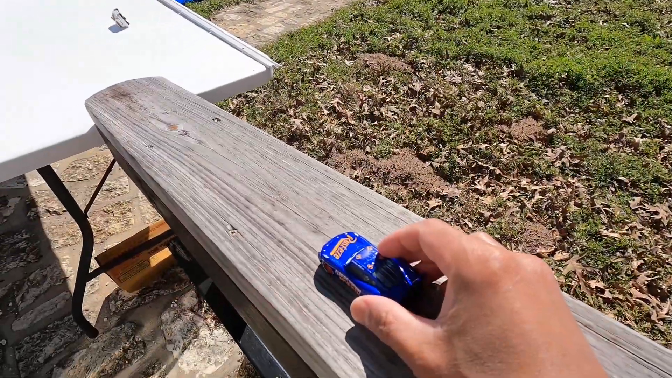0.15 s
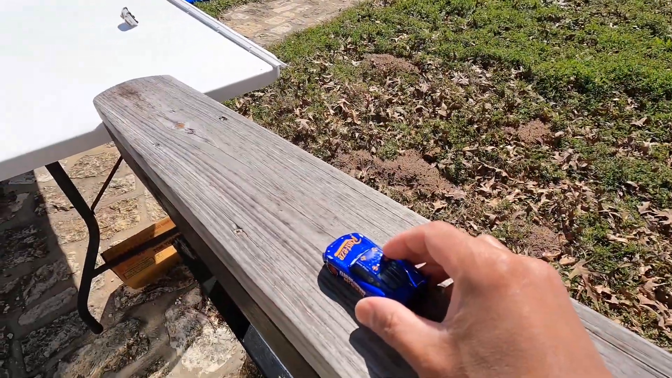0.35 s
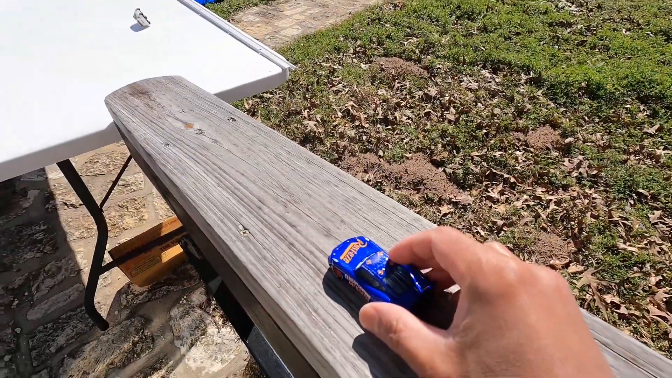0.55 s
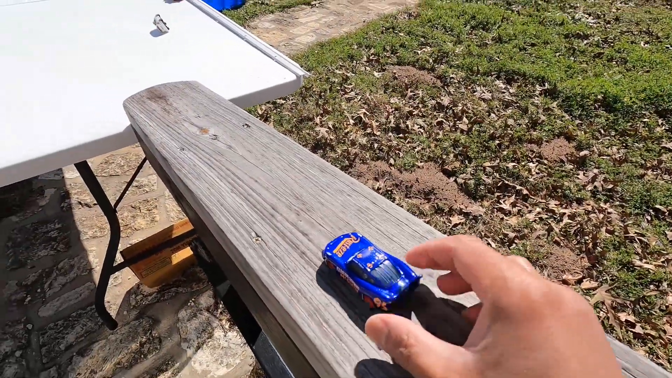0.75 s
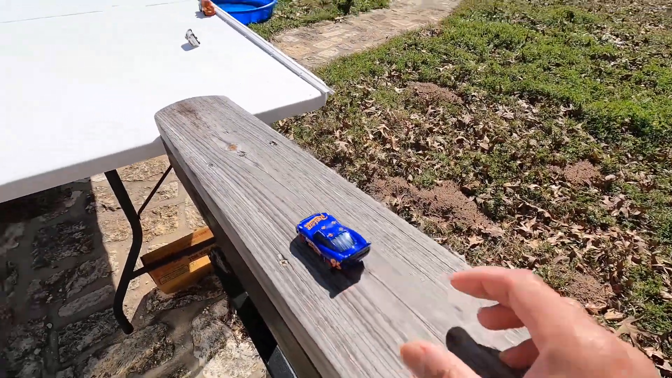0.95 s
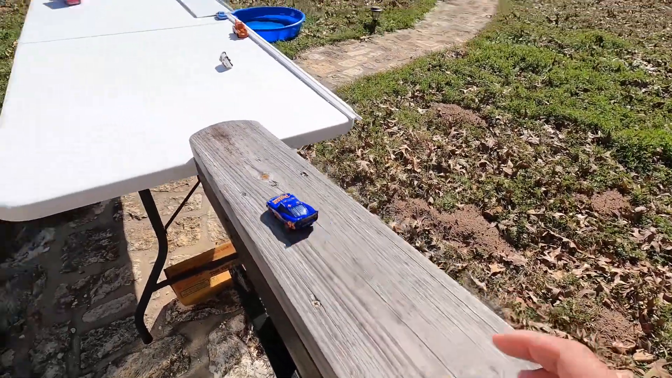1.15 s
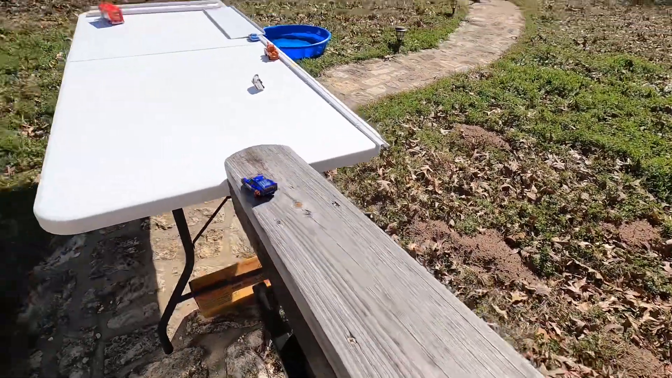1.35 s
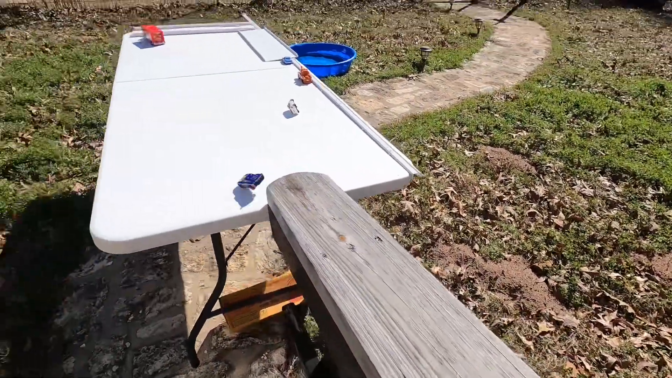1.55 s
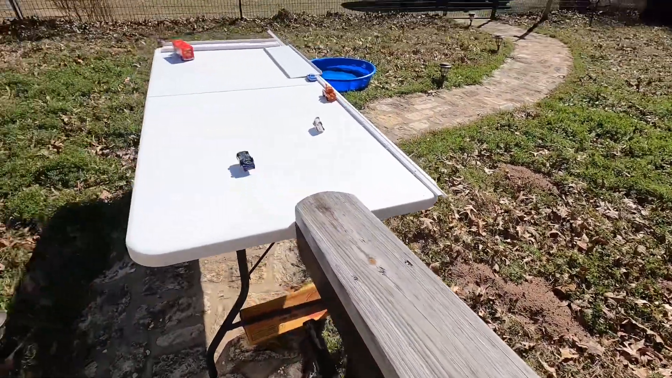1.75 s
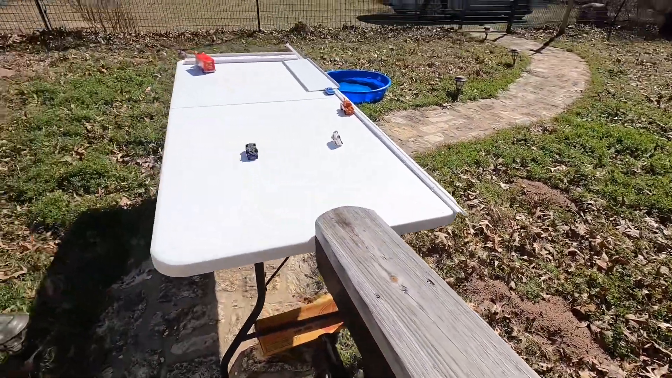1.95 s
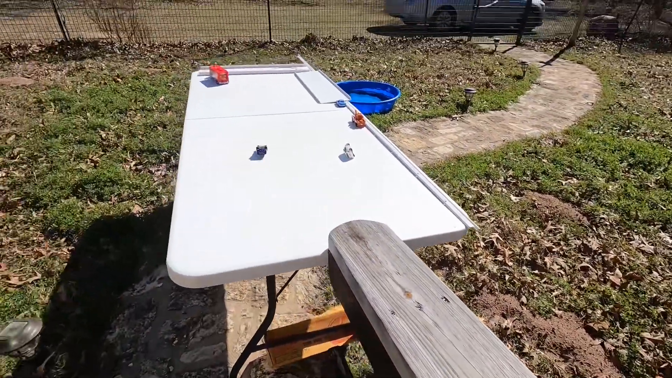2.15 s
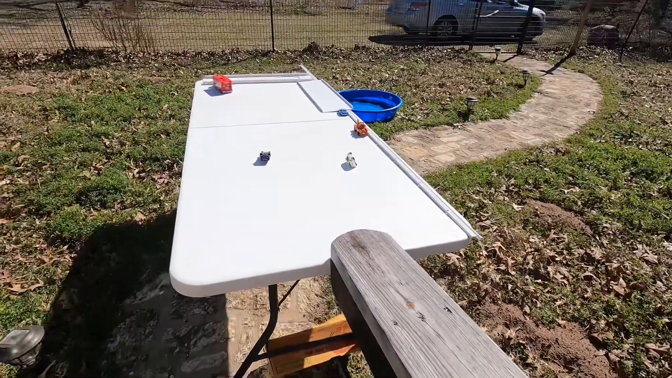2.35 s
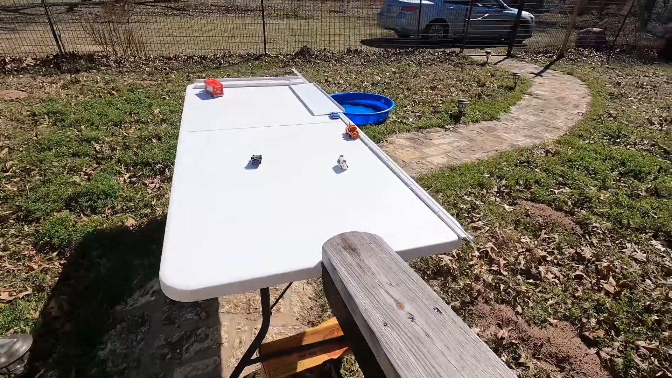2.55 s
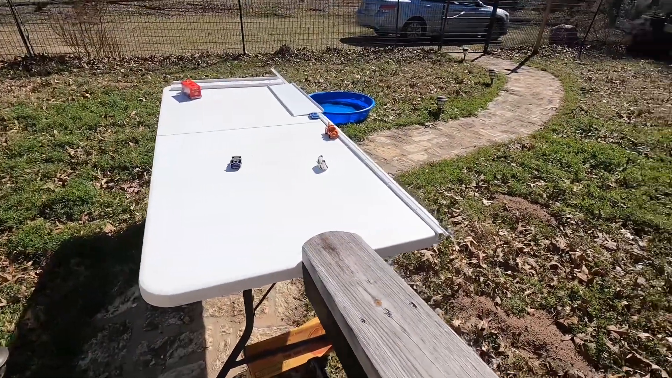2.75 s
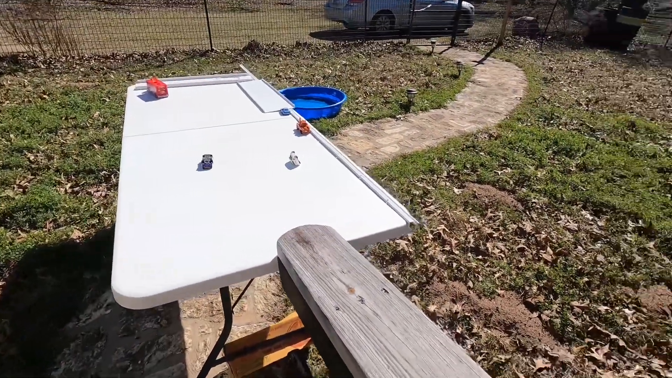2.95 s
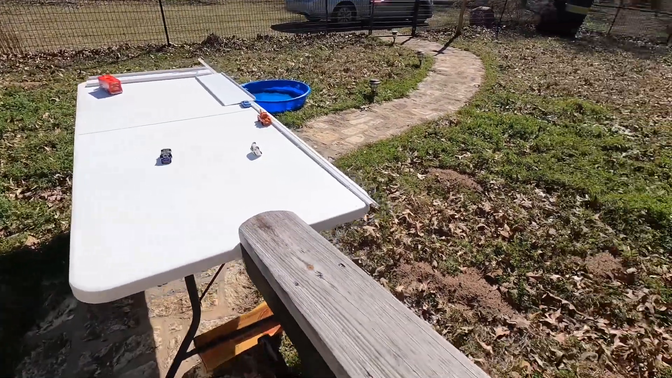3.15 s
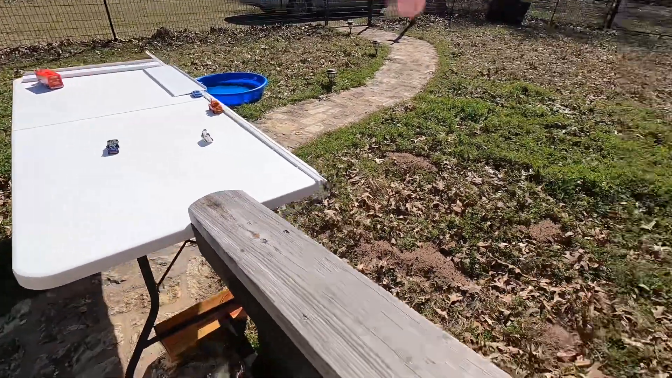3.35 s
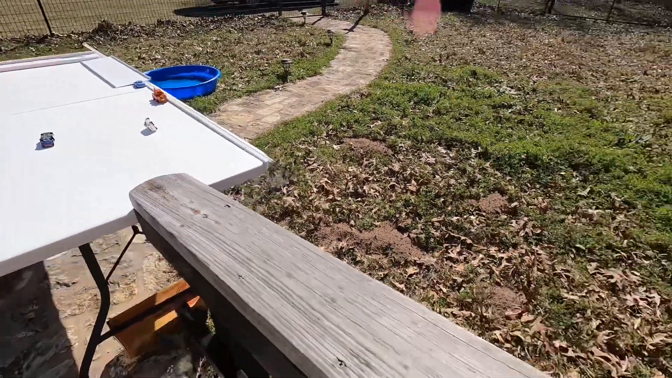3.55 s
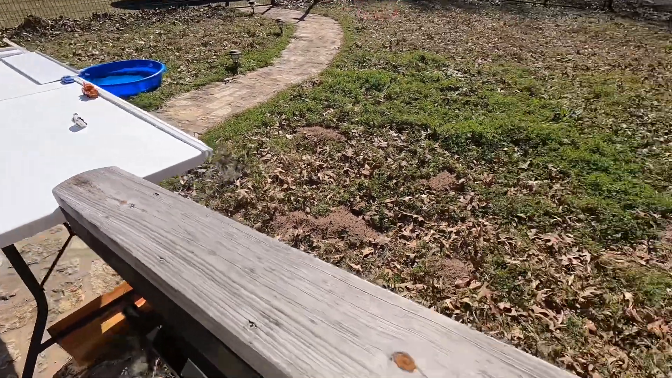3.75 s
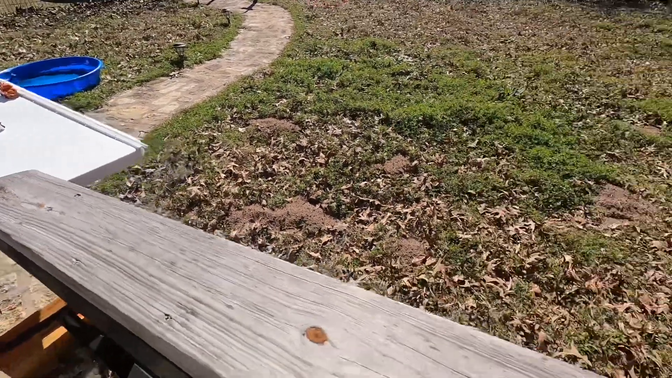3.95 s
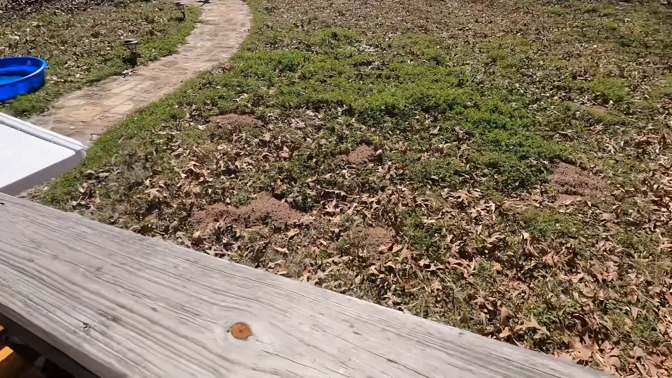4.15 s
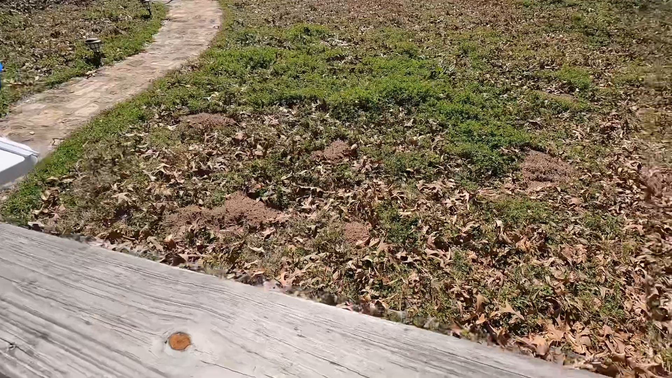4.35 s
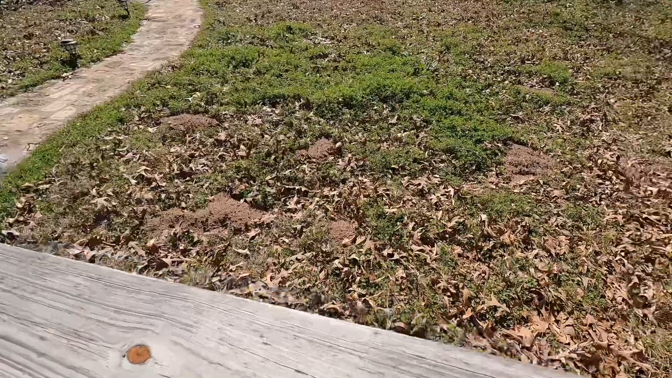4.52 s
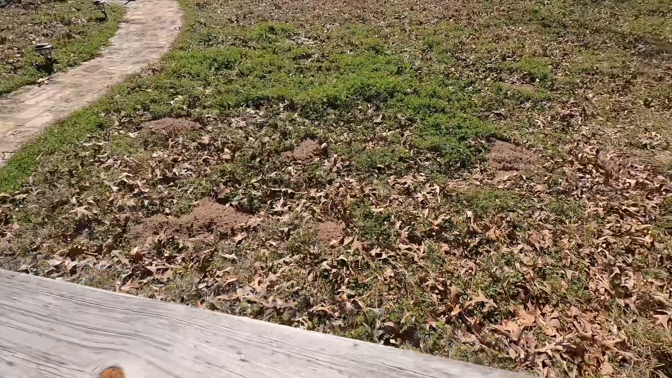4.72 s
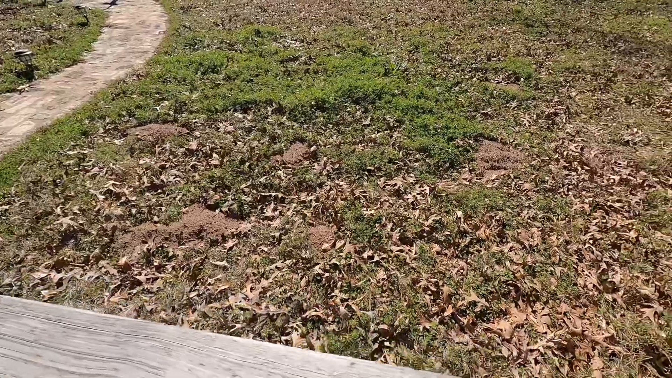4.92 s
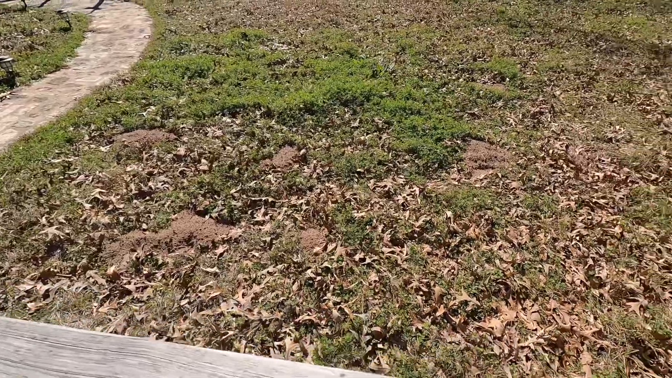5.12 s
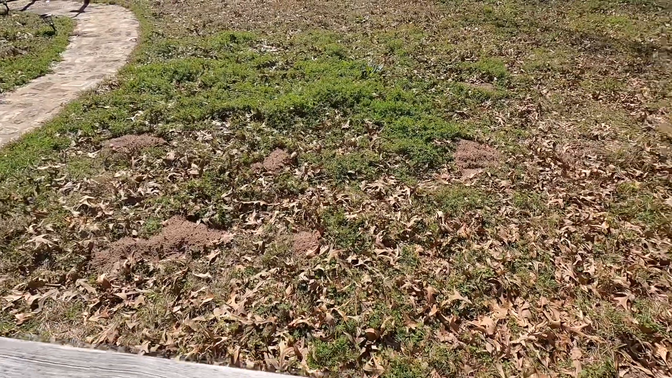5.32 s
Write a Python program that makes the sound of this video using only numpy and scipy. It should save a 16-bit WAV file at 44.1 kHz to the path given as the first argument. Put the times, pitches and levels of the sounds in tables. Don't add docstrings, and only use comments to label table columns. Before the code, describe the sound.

A small metal toy car rattles down a wooden board, clatters onto a hollow plastic table, skids, then toys clack in a bin outdoors.

```python
import sys
import numpy as np
from scipy import signal
from scipy.io import wavfile
from scipy.ndimage import uniform_filter1d

SR = 44100
rng = np.random.default_rng(int(sys.argv[2]) if len(sys.argv) > 2 else 0)


def master(y):
    cut = np.clip(np.atleast_2d(y).T, -1, 1)
    pcm = np.round(cut * 32767)
    wavfile.write(sys.argv[1], SR, pcm.astype(np.int16))


def magnitude_from_level(level_db):
    exponent = np.asarray(level_db, float) / 20
    return 10 ** exponent


N = 241793

# (frequency [Hz], width [Hz], level [dB])
TABLE = [(70, 43, -15), (124.7, 23.3, -5.5), (171.5, 18.7, -4.5), (197, 25, -2.5), (258, 94, 2.5),
         (309.3, 33, -3), (403, 42, -8), (475, 103, 0.5), (610, 123, -3.5), (751, 62, -12.5),
         (928, 134, -6.5), (1200, 45, -16), (1450, 170, -12.5), (1800, 64, -15.5)]
# (frequency [Hz], width [Hz], level [dB])
SHELL = [(1160, 320, -6.5), (1515, 560, -2), (1780, 460, -2), (2136, 310, -1), (2450, 310, -6),
         (3024, 330, -4), (3416, 630, -1), (4390, 603, -2)]
# (frequency [Hz], width [Hz], level [dB])
SHELL_TOP = [(4670, 390, -5.5), (5220, 550, -0.5), (6480, 520, -8.5), (7180, 820, -4.5), (9430, 1520, -3.5),
             (10400, 3500, -16), (12920, 1600, -17.5)]


def rms_one(x):
    return x / np.sqrt(np.mean(x ** 2) + 1e-20)


def gains(*tables):
    knots = np.arange(0, N + 30, 30) / SR
    steps = 0
    for table in tables:
        s, *columns = np.transpose(table)
        steps = steps + magnitude_from_level([np.interp(knots, s, column, -200, -200) for column in columns])
    smooth = uniform_filter1d(steps, size=10, axis=1)
    return np.array([np.interp(np.arange(N) / SR, knots, row) for row in smooth])


def swells(rows, depth_db):
    shapes = []
    for start, rise, hold, fall, db in rows:
        times = start + np.cumsum(np.abs([0, rise, hold, fall]))
        shapes.append(np.transpose([times, db - depth_db * np.array([1, 0, 0, 1])]))
    return gains(*shapes)[0]


def at_hz(points, hz):
    points_hz, values = np.transpose(points)
    return np.interp(np.log(hz), np.log(points_hz), values)


def drift(rate):
    r = np.exp(-2 * np.pi * rate / SR)
    return rms_one(signal.lfilter([1], [1, -2 * r, r * r], rng.standard_normal(N + SR))[SR:])


def ring(clicks, hz, width_hz):
    w = 2 * np.pi * hz / SR
    r, wide = np.exp(-np.pi * width_hz / SR), np.exp(-3.0 * np.pi * width_hz / SR)
    free = signal.lfilter([0, 2 * np.sin(w)], [1, -2 * r * np.cos(w), r * r], clicks + 1e-18)
    soften = [(1 - wide ** 2) / 2, 0, (wide ** 2 - 1) / 2]
    return signal.lfilter(soften, [1, -2 * wide * np.cos(w), wide ** 2], free)


def grains(per_s, spread_db, table):
    t = np.arange(N) / SR
    born = (rng.random(N) < per_s / SR) & (t >= table[0][0]) & (t <= table[-1][0])
    size = magnitude_from_level(spread_db * np.minimum(rng.exponential(1, N), 3.2))
    return born * size * rng.choice([-1, 1], N)


def rattled(clicks, modes, scatter_db):
    out, at = np.zeros(N), np.flatnonzero(clicks)
    during = slice(at[0], at[-1] + 1)
    for hz, width, db in modes:
        push = np.zeros(N)
        push[at] = clicks[at] * magnitude_from_level(db + scatter_db * rng.standard_normal(len(at)))
        out[during] += ring(push[during], hz, width)
    return out / np.std(out[during])


def struck(times, levels_db, chatter_s, modes, scatter_db=4.5, first_db=8, rise_s=0.0009):
    out, t = np.zeros(N), np.arange(4000) / SR
    slowest_s = 2.2 / min(width for _, width, _ in modes)
    for s, level_db, t60 in np.broadcast(times, levels_db, chatter_s):
        at = round(s * SR)
        shape = np.exp(-np.log(1000) * t / max(t60, .002)) * (1 - np.exp(-t / max(rise_s, 1e-4)))
        push = shape * rng.standard_normal(4000) * (rng.standard_normal(4000) > .8)
        push *= np.sqrt(np.sum(shape ** 2) / 5 / (np.sum(push ** 2) + 1e-9))
        push[0] = magnitude_from_level(first_db)
        end = min(4000, round(SR * (t60 + slowest_s)))
        for hz, width, db in modes:
            strength, detune = rng.standard_normal(2)
            signs = 1 - 2 * rng.integers(2, size=end, dtype=np.int8)
            rung = ring(push[:end] * signs, hz * (1 + 0.029 * detune), width)
            out[at:at + end] += magnitude_from_level(level_db + db + scatter_db * strength) * rung
    return out


def sung(rows, width_hz):
    return sum(struck(s, db, t60, [(hz, width_hz, 0)], scatter_db=-6.5, first_db=-10, rise_s=0.0027)
               for s, db, hz, t60 in rows)


def banded_noise(spectrum, patchy_db):
    # (frequency [Hz], likeness [0..1])
    likeness = [(100, 0.98), (1000, 0.35), (5000, 1), (9000, 1), (13000, .2)]
    out, together = 0, drift(12)
    white = rng.standard_normal((2, 2, N))
    edges = 80 * 2 ** (np.arange(24) / 3)
    edges = edges[edges >= spectrum[0][0]]
    for k, (low, high) in enumerate(zip(edges, edges[1:])):
        band = signal.butter(2, [low, high], "band", fs=SR, output="sos")
        mid, side = signal.sosfilt(band, white[k % 2])
        hz = np.sqrt(low * high)
        alike = np.clip(at_hz(likeness, hz), 0, 1)
        pair = np.sqrt(1 + alike) * mid + np.sqrt(1 - alike) * side * [[1], [-1]]
        out = out + magnitude_from_level(at_hz(spectrum, hz)) * pair
    return rms_one(out * magnitude_from_level(patchy_db * together))


def rolling():
    # (time [s], level [dB])
    roll = [
        (0.62, -77),
        (0.684, -57),
        (0.86, -43),
        (0.988, -39.5),
        (1.098, -40.5),
        (1.358, -42),
        (1.462, -40.5),
        (1.495, -50),
        (1.549, -59),
    ]
    # (time [s], peak [dB])
    ridges = [(0.7566, -37), (0.7666, -35), (0.776, -38), (0.7918, -39), (0.8077, -42), (0.833, -32.5),
              (0.8409, -43), (0.857, -39), (0.8655, -40), (0.8818, -31), (0.8935, -21.5), (0.903, -33),
              (0.9147, -31), (0.9236, -33), (0.9366, -42), (0.944, -31), (0.9556, -25.5), (0.967, -24),
              (0.977, -19), (0.991, -18), (1.003, -28), (1.0167, -20.5), (1.0281, -26.5), (1.0344, -30),
              (1.0427, -30), (1.047, -27.5), (1.0658, -39), (1.0787, -26), (1.0867, -33), (1.093, -23),
              (1.102, -37), (1.107, -24), (1.1229, -22), (1.1349, -19), (1.1411, -20), (1.1544, -23),
              (1.1596, -25), (1.1678, -30), (1.1776, -25.5), (1.1898, -29), (1.2047, -22.5),
              (1.2146, -23.5), (1.2264, -20.5), (1.2366, -23), (1.2477, -23), (1.256, -21.5), (1.265, -25),
              (1.279, -20), (1.293, -26), (1.3046, -27), (1.313, -20), (1.321, -26.5), (1.3384, -19),
              (1.353, -19), (1.363, -19.5), (1.383, -22), (1.402, -23.5), (1.4107, -28), (1.4253, -19),
              (1.442, -22)]
    # (frequency [Hz], width [Hz], level [dB])
    body = [(1406, 250, -13), (1786, 270, -4.5), (2170, 404, 3), (2544, 290, -7), (3300, 960, -10.5),
            (4150, 950, -1.5)]
    axles = [(5210, 140, -2.5), (5000, 590, -5.5), (6600, 750, 3.5), (7300, 900, 5), (8870, 310, -7.5),
             (9700, 2200, 5), (12600, 1800, -22)]
    # (start [s], rise [s], hold [s], fall [s], level [dB])
    board_end = [(1.31, 0.055, 0.26, 0.03, -40.5)]
    # (time [s], level [dB], frequency [Hz], chatter [s])
    flight = [
        (1.475, -52, 5200, .1),
        (1.5, -54, 5180, 0.074),
        (1.508, -50, 2950, 0.029),
        (1.515, -61, 5850, .07),
    ]
    s, rattle_db = np.transpose(roll)
    axle_db = rattle_db - 15 + 25.5 * (s - 1)
    rattle, bright, hum = gains(np.transpose([s, rattle_db, axle_db, rattle_db - 15.5]))
    clicks = grains(per_s=2800, spread_db=-0.5, table=roll) * magnitude_from_level(0.83 * drift(90))
    s, peak_db = np.transpose(ridges)
    jolts = struck(s, peak_db - 13, 0.011, body + [(1150, 260, -19)], 2.5, first_db=2.5)
    jolts += struck(s, peak_db - 30, 0.018, axles, first_db=3.0)
    end = swells(board_end, depth_db=33) * rattled(clicks, [(195, 21.5, 0)], 1.7)
    board = hum * rattled(clicks, [(168.0, 21, -2.5), (292, 47, -4.5)], 4.7)
    wheels = rattle * rattled(clicks, body, 6.5) + bright * rattled(clicks, axles, 6.0)
    return wheels + jolts + sung(flight, width_hz=130) + board + end


def tumbling():
    # (time [s], peak [dB], table boom over the peak [dB], face [Hz], chatter [s])
    landings = [(1.3337, -19.5, -37, 2200, 0.025), (1.4691, -13, -23.5, 2170, 0.033),
                (1.4846, -21, -28, 1990, 0.013), (1.548, -33, 4, 1040, 0.03),
                (1.559, -3, -6.5, 3340, 0.041), (1.5914, -3.5, -20, 2750, 0.038),
                (1.646, -14.5, -6.5, 2750, 0.034), (1.7082, -4.5, -8, 2640, 0.026),
                (1.7939, -12.5, 1, 2700, 0.061), (1.8047, -10.5, -10.5, 2330, 0.029),
                (1.833, -15.5, 2.5, 2220, 0.07), (1.851, -16, -7, 2200, 0.037),
                (1.863, -28, -11, 2300, 0.025), (1.889, -27.5, 3, 3300, 0.078),
                (1.9727, -45.5, 16, 3300, 0.027), (2.162, -32, 7.5, 2310, 0.016),
                (2.1807, -32, 8.5, 2410, 0.13), (2.201, -34, -1, 2300, 0.026),
                (2.213, -35, -11, 2200, 0.033), (2.239, -37.5, -21, 2180, 0.061),
                (2.2612, -37.5, -13, 2170, 0.072), (2.276, -34.5, -1, 2130, 0.046),
                (2.294, -39.5, 1.5, 2190, 0.04), ]
    s, peak_db, boom_db, face_hz, chatter_s = np.transpose(landings)
    metal = struck(s, peak_db - 20.5, chatter_s, SHELL, 1.9, first_db=2.5)
    metal += struck(s, peak_db - 23, 1.25 * chatter_s, SHELL_TOP, 0.97, first_db=0.0)
    face = sum(struck(at, db - 16, .6 * t60, [(hz, 330, 0)], scatter_db=0, first_db=6)
               for at, db, hz, t60 in zip(s, peak_db, face_hz, chatter_s))
    boom = struck(s, peak_db + boom_db - 22.0, 0.043, TABLE[:5], 0.93, first_db=9.0)
    knock = struck(s, peak_db + 0.84 * boom_db - 23.5, 0.054, TABLE[5:], 1.0, first_db=10.0)
    buzz = struck(s, peak_db + boom_db - 34, 0.31, TABLE[5:], 1.4, first_db=-5.5, rise_s=0.0049)
    return metal + face + boom + knock + buzz


def skidding():
    # (time [s], level [dB])
    force = [
        (1.84, -31),
        (1.858, -27),
        (1.909, -39),
        (2.158, -45.5),
        (2.182, -53),
        (2.272, -75),
        (2.294, -44),
        (2.316, -84),
        (2.396, -90.5),
    ]
    span = [(1.3,), (2.9,)]
    # (start [s], rise [s], hold [s], fall [s], level [dB])
    high_squeal = [(1.86, 0.028, 0.237, 0.038, -56)]
    roof_tone = [
        (1.97, 0.021, 0.097, 0.07, -44),
        (2.17, 0.01, 0.018, 0.123, -39.5),
    ]
    axle_spin = [
        (1.32, 0.016, 0.05, 0.2, -60),
        (2.13, 0.039, 0.046, 0.2, -62),
    ]
    tip_scrape = [
        (2.712, 0.04, 0.05, 0.065, -51),
    ]
    # (time [s], frequency [Hz], level [dB])
    drone = [
        [(1.86, 136, -40), (1.928, 129.2, -45), (2.04, 159.3, -33.5), (2.166, 146.7, -39.5),
         (2.196, 154.6, -26.5), (2.234, 130.4, -34.5), (2.36, 157, -44), (2.47, 157, -63.5)],
        [(2.73, 112, -62), (2.76, 111, -41.5), (2.816, 114, -41.5), (2.87, 154, -38.5), (2.95, 160, -65.5)],
    ]
    # (frequency [Hz], level [dB per Hz])
    grit = [(290, -16), (500, 5.5), (839, -16), (2360, -10), (5200, -20), (7780, -23), (10200, -20.5),
            (15500, -44)]
    s, force_db = np.transpose(force)
    scrape, rumble = gains(np.transpose([s, force_db, -11.5 + 0.61 * force_db]))
    squeal, roof = swells(high_squeal, depth_db=8), swells(roof_tone, depth_db=29.0)
    fine = grains(per_s=3000, spread_db=-0.5, table=span)
    out = rumble * rattled(fine, TABLE[4:], 2.9)
    out += 0.55 * roof * rattled(fine, [(2365, 67, 0)], 4.9)
    out += squeal * rattled(fine, [(10120, 360, 4.0), (13900, 580, -13)], 8.3)
    spin = sum(swells([spell], depth_db=38) * rattled(fine, [(hz, 60, 0)], 2.7)
               for spell, hz in zip(axle_spin, (5200, 5080)))
    out += 0.69 * magnitude_from_level(3.3 * drift(44.6)) * spin
    for line in drone:
        s, hz, level_db = np.transpose(line)
        wavering_hz = np.interp(np.arange(N) / SR, s, hz) * (1 + 0.0422 * drift(22.8))
        level = gains(np.transpose([s, level_db + 4.5]))[0] * magnitude_from_level(3.6 * drift(46))
        out += level * np.sin(2 * np.pi * np.cumsum(wavering_hz) / SR)
    coarse = grains(per_s=2500, spread_db=1.0, table=force)
    out += .6 * scrape * magnitude_from_level(2.2 * drift(25)) * rattled(coarse, SHELL, 5.0)
    tip_modes = [(1400, 800, 6), (3200, 2800, 11.0), (6740, 6800, -3), (12500, 3900, -16)]
    out += swells(tip_scrape, depth_db=10.5) * rattled(fine, tip_modes, 2.0)
    return out + 0.5 * scrape * magnitude_from_level(2.1 * drift(40)) * banded_noise(grit, patchy_db=.8)


def tap():
    s, roof_db, table_db = 2.8295, -36.5, -46
    roof_modes = [(2374, 130, -0.5), (2700, 390, -8)] + SHELL[:2]
    knock_modes = [(hz, width, db - 8.0 * (hz < 500)) for hz, width, db in TABLE[5:]]
    roof = struck(s, roof_db - 2.5, 0.045, roof_modes, 1.0, first_db=8.5)
    knock = struck(s, table_db + 2.0, 0.1, knock_modes, 0.52, first_db=4.0)
    after = struck(s + 0.0084, roof_db - 15, 0.084, SHELL[4:] + SHELL_TOP, 1.0, first_db=4.0, rise_s=0.0033)
    return roof + knock + after


def loose_parts():
    # (time [s], level [dB], frequency
    # [Hz], chatter [s])
    clatter = [(1.912, -44, 2300, .03), (1.945, -48, 2350, .03), (1.95, -50, 4500, .02),
               (1.985, -45, 3200, 0.042), (1.99, -42, 1000, 0.035), (2.105, -46, 2050, .03),
               (2.11, -49, 3900, .03), (2.18, -49, 2470, 0.026), (2.19, -43, 900, .04),
               (2.29, -55, 1104, .05), (4.719, -56, 4500, .015)]
    # (time [s], level [dB], frequency [Hz], t60 [s])
    axle_rings = [
        (1.215, -52, 5250, .15),
        (1.337, -43, 5220, .25),
        (1.47, -48, 5170, 0.34),
        (2.145, -53, 5070, .4),
        (2.188, -48, 5075, 0.62),
        (2.31, -62.5, 5170, 1.4),
    ]
    # (time [s], level [dB], frequency [Hz], t60 [s])
    after_rings = [
        (1.565, -18, 195, .2),
        (2.838, -33, 215, .1),
        (5.281, -42, 6060, 0.047),
        (5.304, -48, 6160, .08),
        (5.283, -26, 1970, .15),
        (5.302, -30, 1970, .12),
    ]
    t, out = np.arange(N) / SR, sung(clatter, width_hz=330)
    flutter = magnitude_from_level(2 * drift(40))
    for s, db, hz, t60 in axle_rings + after_rings:
        age = np.maximum(t - s, 0)
        fade = magnitude_from_level(db - 60 * age / t60) * (1 - np.exp(-age / 0.0023))
        out += fade * flutter * np.sin(2 * np.pi * hz * age)
    return out


def rummaging():
    # (start [s], rise [s], hold [s], fall [s], level [dB])
    handfuls = [
        (4.53, 0.044, 0.055, 0.36, -36),
        (4.72, 0.17, 0.018, 0.036, -31.5),
        (4.94, 0.097, 0.007, 0.045, -30),
        (5.07, 0.081, 0.012, 0.18, -22.5),
        (5.21, 0.064, 0.03, 0.064, -31),
    ]
    span = [(4.52,), (5.45,)]
    # (time [s], peak [dB], knock on the bin [dB], shell [Hz], treble [dB])
    clack_rows = [(4.557, -21, -31, 1170, -35), (4.565, -19, -24, 2130, -34.5),
                  (4.5703, -18, -29.5, 1300, -32), (4.578, -31, -43, 1800, -35.5),
                  (4.632, -20.5, -28, 1550, -27.5), (4.6485, -35, -28.5, 1300, -50),
                  (4.6865, -24, -32.5, 2080, -44.5), (4.7428, -33, -54, 1960, -40),
                  (4.7556, -21, -31.5, 1250, -35.5), (4.782, -18.5, -30.5, 1910, -39),
                  (4.8, -13, -29, 1450, -37), (4.8085, -20, -26, 1470, -36.5),
                  (4.8216, -20, -25.5, 2170, -39), (4.8316, -16, -33, 1734, -39),
                  (4.854, -35, -37, 1360, -37), (4.8665, -12, -23, 1590, -33.5),
                  (4.8785, -17, -24, 1545, -30), (4.9698, -28.5, -35, 1390, -62),
                  (4.9984, -27, -32, 1450, -40.5), (5.005, -18.5, -26.5, 1520, -33.5),
                  (5.0374, -12.5, -34, 1674, -30), (5.0948, -21, -37, 1850, -28.5),
                  (5.0999, -11.5, -40, 1580, -23.5), (5.1135, -24, -45, 1570, -32),
                  (5.119, -18, -45, 1630, -30.5), (5.1352, -15, -25.5, 1580, -37),
                  (5.1404, -16, -24, 1600, -29), (5.1493, -7, -22.5, 1540, -27),
                  (5.1586, -15, -26, 1480, -32), (5.163, -11.5, -28.5, 1450, -27.5),
                  (5.176, -16, -25, 1460, -29), (5.1858, -19, -27.5, 1110, -35),
                  (5.1971, -18, -40, 1460, -27), (5.23, -19, -27.5, 1280, -43),
                  (5.2611, -19, -33, 1380, -54), (5.2805, -12, -31, 1930, -29.5),
                  (5.2917, -36, -38, 1970, -54), (5.3024, -19, -43, 1480, -45),
                  (5.321, -37, -47, 1470, -47), (5.3286, -33, -35, 1480, -60)]
    # (time [s], peak [dB])
    nudges = [(4.596, -49), (4.619, -29), (4.642, -25), (4.661, -37), (4.726, -23), (4.765, -27),
              (4.889, -19), (4.898, -31), (4.907, -40), (4.915, -33), (5.023, -26), (5.0475, -32),
              (5.058, -25), (5.065, -30), (5.211, -27), (5.22, -24), (5.252, -26), (5.271, -41),
              (5.311, -25)]
    # (time [s], level [dB], frequency [Hz], chatter [s])
    drags = [(4.803, -44.5, 2130, 0.055), (4.865, -43, 1630, 0.065), (5.045, -45.5, 1700, 0.059),
             (5.06, -43, 1760, 0.039), (5.097, -29.5, 1800, 0.055), (5.108, -33.5, 1610, 0.071),
             (5.2805, -33, 1970, 0.04), (5.283, -38.5, 1450, 0.041), (5.298, -41, 1970, 0.055),
             (5.303, -41.5, 1450, 0.068)]
    # (frequency [Hz], width [Hz], level [dB])
    bin_modes = [(234, 132, -2.5), (387, 130, 0), (530, 122, -2), (660, 320, -2), (916, 297, -1.5)]
    pile = [(1000, 134, -9), (1480, 274, 3), (1700, 170, -6.5), (1960, 320, 2), (2280, 1200, -5.5)]
    pile_top = [(2750, 1650, 17), (3670, 860, -1), (4900, 1700, 5), (5850, 2300, 3), (7500, 3700, -6.5),
                (9570, 1900, -18)]
    levels = swells(handfuls, depth_db=25.0) * magnitude_from_level([[-4], [-10], [-17]])
    clicks = grains(per_s=2200, spread_db=2.5, table=span) * magnitude_from_level(2.0 * drift(40))
    shuffle = sum(level * rattled(clicks, modes, 5.5)
                  for level, modes in zip(levels, (bin_modes, pile, pile_top)))
    s, peak_db, knock_db, shell_hz, treble_db = np.transpose(clack_rows)
    clacks = struck(s, peak_db - 21.5, 0.022, pile, 2.1, first_db=2.0, rise_s=0.00082)
    clacks += struck(s, treble_db - 13.5, 0.026, pile_top, 1.94, first_db=-2.5, rise_s=0.00092)
    for at, db, hz in zip(s, peak_db, shell_hz):
        clacks += struck(at, db - 18, 0.024, [(hz, 140, 0)], scatter_db=1.0, first_db=5.5, rise_s=0.003)
    clacks += struck(s, knock_db - 12.5, 0.038, bin_modes, 3.57, first_db=4.5)
    s, peak_db = np.transpose(nudges)
    clacks += struck(s, peak_db - 16.5, 0.01, pile + [(3000, 900, -8)], 3.0, first_db=0.5)
    clacks += sung(drags, width_hz=108)
    round_the_hand = signal.butter(2, 7500, fs=SR, output="sos")
    return signal.sosfilt(round_the_hand, shuffle + clacks)


def ticks():
    # (time [s], peak [dB])
    contacts = [(2.683, -52.5), (4.565, -38), (4.5814, -42), (4.6332, -65), (4.743, -60), (4.83, -43),
                (4.8682, -45), (4.877, -38.5), (5.0388, -50), (5.282, -40.5)]
    s, peak_db = np.transpose(contacts)
    return struck(s, peak_db, 0.0064, SHELL_TOP[1:] + [(12700, 3800, -21)], scatter_db=0.5, first_db=6.0)


def sleeve():
    # (start [s], rise [s], hold [s], fall [s], level [dB])
    swish = [
        (2.97, 0.057, 0.037, 0.18, -56.5),
        (3.15, 0.082, 0.23, 0.15, -61),
        (3.33, 0.091, 0.022, 0.14, -60),
        (3.605, 0.033, 0.032, 0.051, -46.5),
        (3.76, 0.035, 0.8, 0.054, -65.5),
        (3.85, 0.0074, 0.055, 0.041, -68.5),
        (4.28, 0.12, 0.1, 0.05, -72),
        (3.975, 0.021, 0.0034, 0.0088, -53),
    ]
    seam = [(3.15, 0.086, 0.21, 0.15, -74.5)]
    # (frequency [Hz], level [dB per Hz])
    cloth = [(350, -62.5), (600, -18), (1220, -1.5), (2130, -6.5), (3100, -8.5), (4200, -11.5),
             (8990, -23.5), (15500, -52)]
    rustle = swells(swish, depth_db=24)
    hiss = rms_one(ring(rng.standard_normal((2, N)), 11900, 900))
    fine = magnitude_from_level(-34) * rustle + swells(seam, depth_db=10)
    return rustle * banded_noise(cloth, patchy_db=.8) + fine * hiss


def wind_and_grip():
    # (time [s], level [dB])
    wind = [(0.0, -57), (0.24, -49.5), (0.29, -62), (0.81, -46.5), (0.87, -51.5), (1.57, -54),
            (2.21, -52.5), (2.76, -62), (3.1, -52), (3.52, -46), (3.57, -50.5), (3.75, -40), (4.18, -47.5),
            (4.56, -39), (4.88, -52), (4.98, -32.5), (5.19, -42), (5.48, -57)]
    # (time [s], peak [dB], frequency [Hz])
    bumps = [(3.334, -36.5, 112), (3.441, -31, 55.5), (3.738, -19, 66.6), (3.805, -23.5, 45),
             (3.858, -39, 39), (3.87, -41.5, 333), (3.956, -42.5, 423), (3.969, -21.5, 70),
             (4.47, -45, 284), (4.251, -30.5, 46), (4.309, -33.5, 58.3), (4.549, -29, 43.6),
             (4.675, -17, 70.0), (5.041, -33, 84), (5.074, -34.5, 43.1)]
    # (frequency [Hz], width [Hz], level [dB])
    housing = [(143, 33.3, 5.5), (300, 120, -14), (630, 160, -20)]
    sub_bass = signal.butter(3, [20, 65], "band", fs=SR, output="sos")
    gust = signal.sosfilt(sub_bass, rng.standard_normal(N))
    out = 0.99 * gains(wind)[0] * rms_one(gust)
    for s, peak_db, hz in bumps:
        out += struck(s, peak_db - 7.5, 0.016, [(hz, .5 * hz, 0)], scatter_db=1.5, first_db=4.5)
        out += struck(s, peak_db - 30.5, 0.053, housing, first_db=11.0, rise_s=0.006)
    return out


def garden():
    # (frequency [Hz], level [dB per Hz])
    traffic = [(53, -32), (90, -8.5), (119, -11), (165, -2.5), (210, -2), (360, -13), (499, -14),
               (839, -30.5)]
    leaves = [ (1040, -18), (2090, -24), (5300, -22.5), (7490, -29), (8530, -36.5), (12300, -41.5),
              (16000, -87)]
    return magnitude_from_level(-58) * banded_noise(traffic + leaves, patchy_db=.3)


def placed(x, pan_db):
    scatter_t60_s, scatter_db, scatter_top_hz = 0.18, -16.5, 2670
    glint_t60_s, glint_db = 0.065, -7.5
    shared = 0.44
    t = np.arange(SR // 5) / SR
    common, left, right, *glint = rng.standard_normal((5, len(t))) * (t > .001)
    tail = (shared * common + (1 - shared) * np.array([left, right])) * magnitude_from_level(-60 * t / scatter_t60_s)
    dull = signal.butter(1, [300, scatter_top_hz], "band", fs=SR, output="sos")
    tail = rms_one(signal.sosfilt(dull, tail))
    glint = rms_one(np.diff(glint * magnitude_from_level(-60 * t / glint_t60_s), 2, prepend=[[0.0017, 0.01]] * 2))
    echoes = (magnitude_from_level(scatter_db) * tail + magnitude_from_level(glint_db) * glint) / np.sqrt(len(t))
    wet = signal.fftconvolve(x[None], echoes, axes=1)[:, :N]
    return (x + wet) * magnitude_from_level([[pan_db / 2], [-pan_db / 2]])


def scene():
    last_tip = tap()
    car = placed(rolling(), -2.7) + placed(tumbling() + 0.29 * last_tip, -1.6)
    car = car + (0.67 * last_tip + skidding() + loose_parts()) * magnitude_from_level([[-.9], [.9]])
    hand = placed(rummaging(), -4.5) + placed(ticks(), -4.0) + sleeve() * magnitude_from_level([[-1.5], [1.5]])
    air = wind_and_grip() * magnitude_from_level([[-2.4], [2.4]]) + garden() * magnitude_from_level([[-1.5], [1.5]])
    return car + hand + air


def roll_off(x):
    return signal.sosfilt(signal.butter(12, 16520, fs=SR, output="sos"), x)


def record(dry):
    treble = signal.sosfilt(signal.butter(1, 11000, "high", fs=SR, output="sos"), dry)
    heard = dry + treble * [[.6], [-.6]]
    rounded = 0.79 * np.tanh(heard / 0.92)
    finished = signal.sosfilt(signal.butter(8, 15300, fs=SR, output="sos"), rounded)
    return roll_off(finished)


dry = scene()
out = record(dry)
master(out)
```